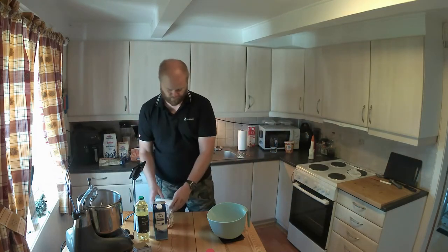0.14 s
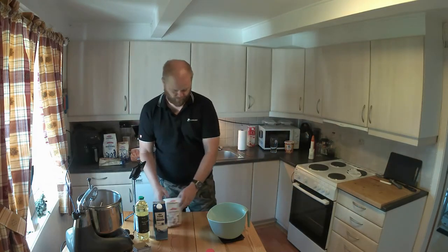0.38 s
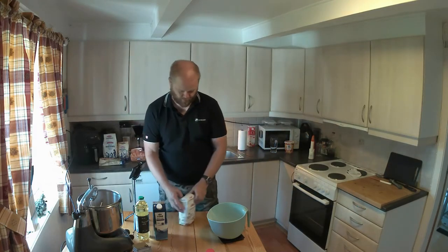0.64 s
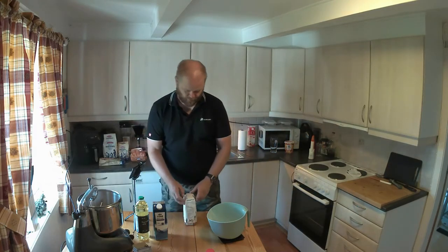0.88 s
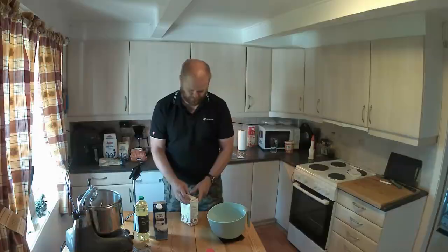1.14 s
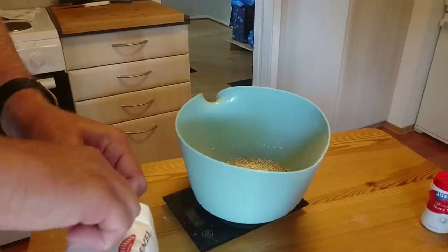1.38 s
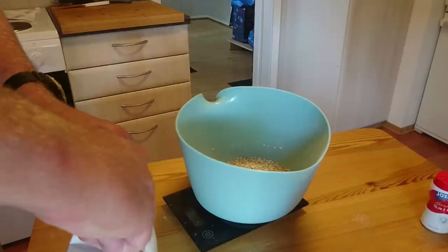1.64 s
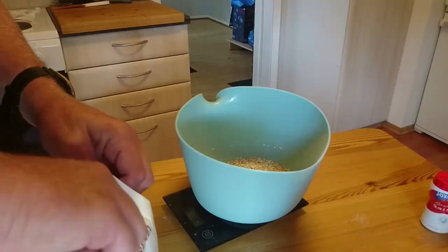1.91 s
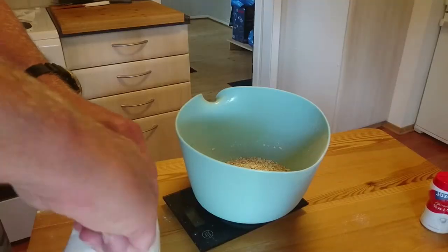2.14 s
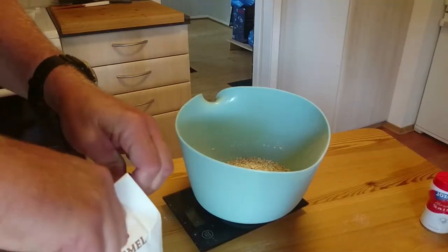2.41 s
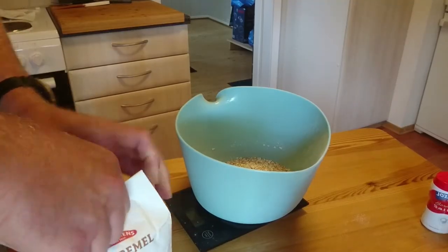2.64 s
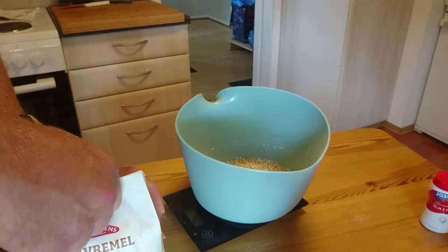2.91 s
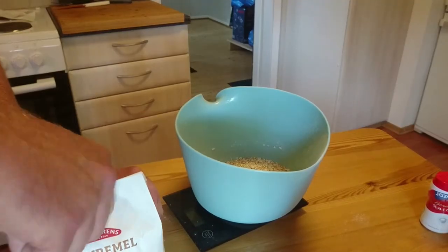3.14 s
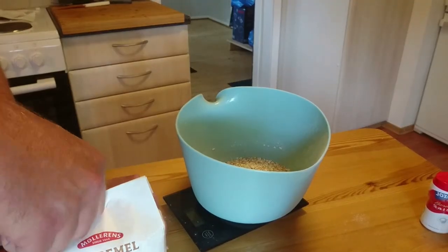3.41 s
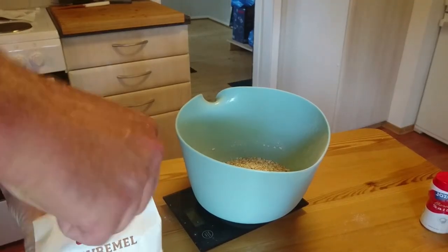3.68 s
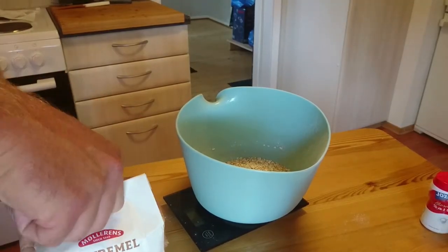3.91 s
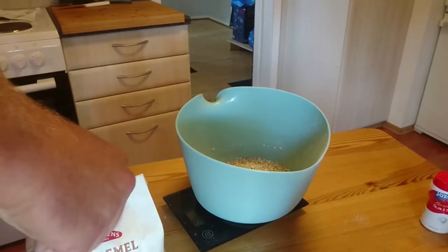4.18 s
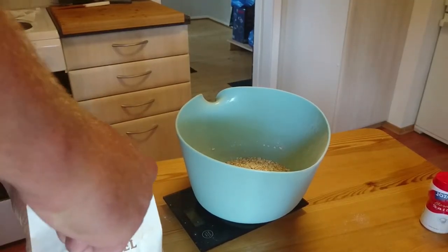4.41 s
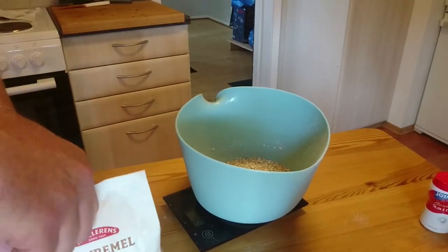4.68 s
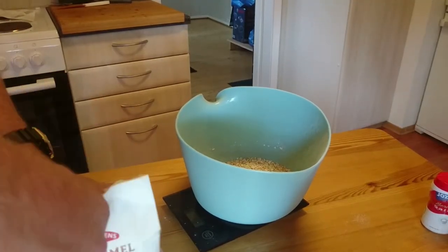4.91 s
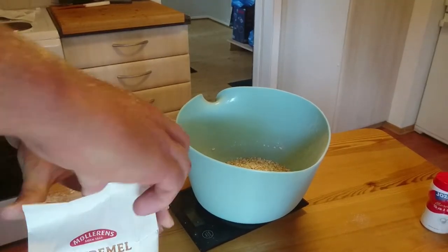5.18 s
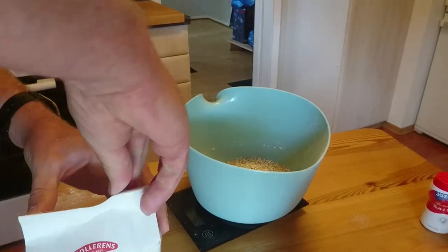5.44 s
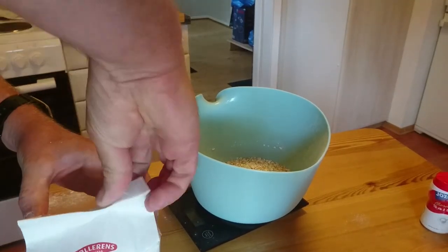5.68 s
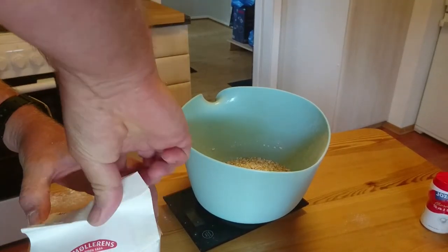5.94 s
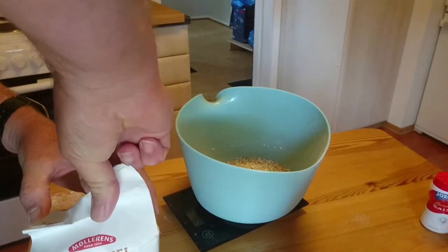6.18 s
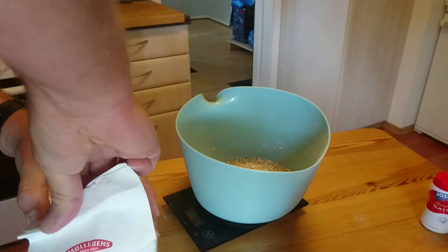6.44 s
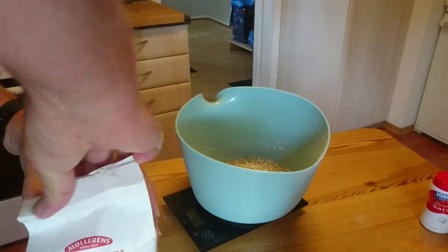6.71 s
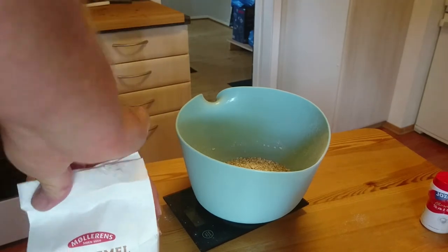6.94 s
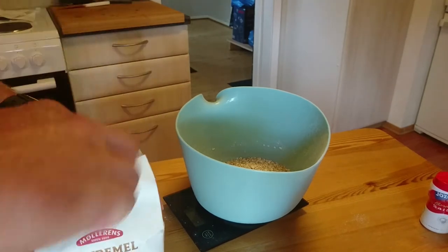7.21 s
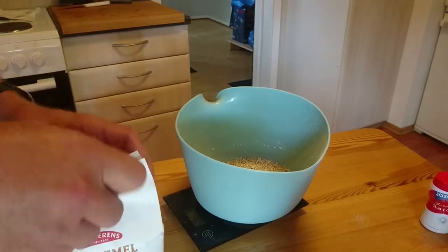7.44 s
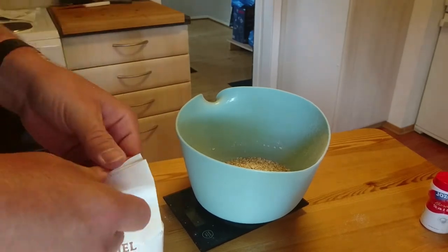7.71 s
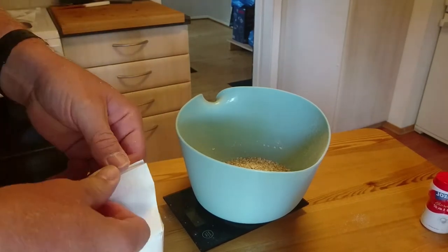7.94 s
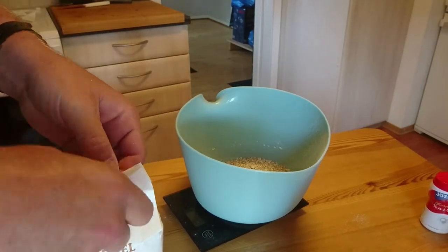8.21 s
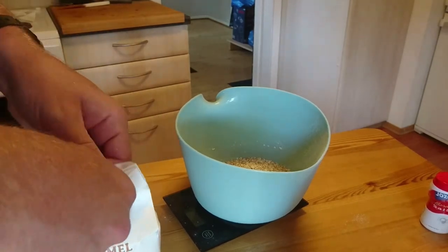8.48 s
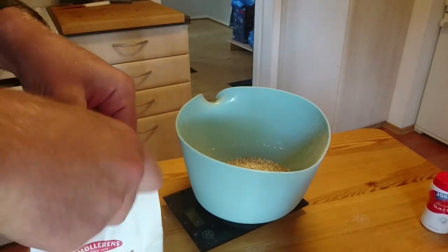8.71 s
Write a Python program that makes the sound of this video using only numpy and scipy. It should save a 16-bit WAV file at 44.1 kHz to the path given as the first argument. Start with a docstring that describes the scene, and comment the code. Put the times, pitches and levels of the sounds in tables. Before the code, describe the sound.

Distant, dull sliding of a bag on wood cuts to crisp close paper crinkling on the left, growing busier and louder with low table bumps.

```python
"""A paper flour bag is handled on a wooden kitchen table, heard from two distances in turn.
First a distant mono microphone hears it slide and land: friction noise rings the table, thuds push its low modes.
Then a close stereo pair, with the bag on its left, hears creases snap as bundles of damped rings, small folds
crackle, fingers rub as noise, the full bag boom softly and the table thud, in a hard-walled kitchen."""
import sys
import numpy as np
from scipy import signal
from scipy.fft import rfft, irfft, next_fast_len
from scipy.io import wavfile
from scipy.ndimage import uniform_filter1d

SR = 44100
rng = np.random.default_rng(int(sys.argv[2]) if len(sys.argv) > 2 else 0)


def persist_wave(psi):
    """Save psi, clipped to +-1, as 16-bit WAV."""
    counts = np.round(np.clip(psi, -1, 1) * 32767).astype(np.int16)
    wavfile.write(sys.argv[1], SR, np.atleast_2d(counts).T)


def voltage_ratio(level):
    """Linear amplitude factor for a level in decibels (scalar or array-like)."""
    return 10 ** (np.asarray(level, float) / 20)


N = 389844
T = np.arange(N) / SR
CUT_S = 1.283  # the close pair takes over
LAG_S = .00027  # the right microphone hears the bag later


def colour(x, table):
    """Linear filtering: the spectrum is weighted by (Hz, dB) points joined on a log axis."""
    size = next_fast_len(N)
    hz, db = np.transpose(table)
    bin_hz = np.arange(size // 2 + 1) * SR / size
    gain = voltage_ratio(np.interp(np.log(bin_hz + 1), np.log(hz + 1), db))
    return irfft(rfft(x, size) * gain, size)[..., :N]


def band(x, lo_hz, hi_hz, order=2):
    """Band limitation: a Butterworth band-pass."""
    return signal.sosfilt(signal.butter(order, [lo_hz, hi_hz], "bandpass", fs=SR, output="sos"), x)


def highpass(x, hz):
    """Radiation efficiency: thin paper radiates no bass."""
    return signal.sosfilt(signal.butter(3, hz, "highpass", fs=SR, output="sos"), x)


def unit(x):
    """Normalisation to rms 1."""
    return x / np.sqrt(np.mean(x ** 2))


def walk(rate):
    """Random modulation: levels drawn every 1 / rate s and slewed, with rms 1."""
    k = int(SR / rate)
    held = np.repeat(rng.standard_normal(N // k + 1), k)
    return unit(uniform_filter1d(held, k)[:N])


def power(s, hold, db, rise_db_s, fall_db_s, share=None):
    """Energy summation: events climb to s, hold, then die at a steady dB rate; share splits them into bands."""
    step = T[::32, None]
    rise_db = rise_db_s * np.maximum(s - step, 0)
    fall_db = fall_db_s * np.maximum(step - s - np.abs(hold), 0)
    each = voltage_ratio(2 * (db - np.minimum(rise_db + fall_db, 120)))
    if share is None:
        return np.interp(T, step[:, 0], each.sum(axis=1))
    return np.array([np.interp(T, step[:, 0], row) for row in (each @ share).T])


def rings(s, peak_db, pan_db, hz, db, t60, late, size):
    """Modal decay: each event is a bundle of damped rings (events x rings), heard left and right."""
    t, waves = np.arange(size) / SR, []
    # bass bends round to both sides
    shadow = np.clip(np.log(hz / 480) / np.log(8), 0, 1.2) * pan_db[:, None] / 2
    for side, sign in enumerate((1, -1)):
        age = np.maximum(t - (late + side * LAG_S)[..., None], 0).astype(np.float32)
        decay = np.exp(-np.log(1000) * age / t60[..., None])
        wave = np.sin(2 * np.pi * hz[..., None] * age) * decay
        waves.append(np.einsum("er,ert->et", voltage_ratio(db + sign * shadow), wave))
    # the mean of the two sides peaks at peak_db
    scale = voltage_ratio(peak_db) / np.abs(waves[0] + waves[1]).max(axis=1) * 2
    first = np.clip(s * SR, 0, N - 1).astype(int)
    where = (first[:, None] + np.arange(size)).ravel()
    return np.array([np.bincount(where, (w * scale[:, None]).ravel(), N + size)[:N] for w in waves])


# colour of the room tone at the close pair, then at the far microphone: pitch_hz, level_db
CLOSE_AIR = [(29, -14), (50, -1), (136, -12.5), (272, -9.5), (369, -13), (724, -6), (919, -16), (4790, -16),
             (9000, -28), (11700, -64), (19800, -120)]
FAR_AIR = [(15, -36), (25, -8), (55, -3.5), (82, -7.5), (117, -9), (236, -15), (962, -25.5), (3250, -35),
           (16000, -27)]


def air(table, db, share):
    """Stationary background noise: quiet room tone whose level wavers a little."""
    mid, side = (unit(colour(rng.standard_normal(N), table)) for _ in range(2))
    side = band(side, 330, 16000, order=1) + 0.61 * side
    return voltage_ratio(db + 1.1 * walk(2.5)) * (mid + share * side * np.array([[1], [-1]]))


# what the kitchen walls give back: pitch_hz, level_db
WALL_COLOUR = [(60, -13), (100, 5.5), (350, 2.5), (700, -0.5), (1500, -4), (2600, -4.5), (4500, -5.5),
               (7500, -2), (12000, 3)]


def kitchen(x):
    """Reverberation: first echo from table and cupboards after 5 ms, then a diffuse decaying tail."""
    t60_s, treble_t60_s, level_db = .65, .6, -0.5
    t = np.arange(int(.7 * SR)) / SR
    noise = rng.standard_normal((2, N))
    # most echoes also come from the left; the bass is alike on both sides
    own = colour(noise[1], [(300, -25), (1200, 4.5), (3000, 4.5)])
    noise[1] = 0.68 * np.roll(noise[0], round(LAG_S * SR)) + own
    noise = colour(noise, WALL_COLOUR)
    low = colour(noise, [(1500, 0), (2800, -6), (5000, -40)])[:, :len(t)]
    treble = noise[:, :len(t)] - low
    tail = low * voltage_ratio(-60 * t / t60_s) + treble * voltage_ratio(-60 * t / treble_t60_s)
    onset = np.clip((t - .0045) / 0.00038, 0, 1)
    tail = tail * onset * (1 + 6.0 * np.exp(-t / 0.015))  # early echoes stand out
    energy = np.sum(tail ** 2, axis=1, keepdims=True)
    tail = tail / np.sqrt(energy) * voltage_ratio(level_db + np.array([[.8], [-.8]]))
    return signal.oaconvolve(x[None] * np.ones((2, 1)), tail, axes=1)[:, :N]


# resonances of the table under the sliding bag: pitch_hz, width_hz, level_db
SLIDE_MODES = [(553, 16, -2), (782, 6.6, 3), (984, 40, -6.5), (1580, 130, -19)]
# broad colour of the grit under the bag: pitch_hz, level_db (per Hz)
SLIDE_BED = [(15, -28), (25, 3), (208, -9.5), (535, -5.5), (636, -7.5), (973, -6.5), (1300, -16),
             (2500, -35), (3250, -54), (5500, -120)]
# drags of the bag over the boards: start_s, hold_s, level_db, hiss_db (relative to level_db)
DRAGS = [(0.067, 0.022, -81, 4), (0.3, .04, -77, -9), (0.36, .15, -66, -6.5), (0.568, 0.046, -65, -5.5),
         (0.625, .02, -61, -8), (0.67, 0.075, -70, -5.5), (0.854, 0.012, -70, -2.5), (0.99, 0.044, -76, -8)]


def slide():
    """Friction excitation: gritty noise from bag on boards rings the table, with a thin hiss above."""
    grit = rng.standard_normal(N) * voltage_ratio(1.2 * walk(59.9))
    table = sum(voltage_ratio(db) * band(grit, hz - w / 2, hz + w / 2, order=1) for hz, w, db in SLIDE_MODES)
    body = unit(table) + voltage_ratio(5.5) * unit(colour(grit, SLIDE_BED))
    hiss_colour = [(900, -33), (2000, -1.0), (6000, -3), (15500, -10), (16500, -50)]
    hiss = colour(rng.standard_normal(N), hiss_colour) * voltage_ratio(3.5 * walk(21.6))
    s, hold, db, hiss_db = np.transpose(DRAGS)
    rise_db_s, fall_db_s, rest_power = 300, 141, voltage_ratio(2 * -86)
    drag = np.sqrt(power(s, hold, db, rise_db_s, fall_db_s) + rest_power)
    thin = np.sqrt(power(s, hold, db + hiss_db, rise_db_s, fall_db_s) + rest_power)
    return drag * unit(body) + thin * unit(hiss)


# bumps of the bag on the table: start_s, level_db, pitch_hz (round which the push is strongest)
THUDS = [(0.401, -56, 90), (0.619, -66, 73), (1.953, -49, 173), (1.999, -55, 43), (2.346, -58.5, 177),
         (2.73, -68, 148), (3.185, -55, 165), (3.239, -56, 42), (3.843, -54.5, 140), (3.949, -44.5, 57.4),
         (4.394, -65, 42), (4.737, -57.5, 200), (5.447, -58, 163), (5.605, -46.5, 204), (5.801, -59, 139),
         (6.111, -62, 171), (6.219, -48, 207), (6.408, -66, 80), (7.006, -69, 210), (7.228, -53, 144),
         (7.339, -57.5, 141), (7.91, -53, 208), (8.121, -45, 207), (8.246, -49, 207), (8.297, -43, 222),
         (8.52, -45.5, 215), (8.712, -43.5, 200), (8.809, -37.5, 213)]
# low modes of the table: pitch_hz, t60_s
TABLE_MODES = [(42, 0.19), (76, 0.25), (145, 0.24), (178, 0.16), (208, 0.13)]


def thuds():
    """Modal excitation: a bump pushes softly into the table's low modes, with a shudder of the legs under it."""
    push_octaves, pan_db = 0.26, 3.5
    out, shudder = 0, unit(band(rng.standard_normal(N), 35, 190))
    for s, level_db, push_hz in THUDS:
        age = np.maximum(T - s, 0)
        for hz, t60 in TABLE_MODES:
            share = np.exp(-(np.log2(hz / push_hz) / push_octaves) ** 2)
            fade = (1 - np.exp(-age / 0.011)) * voltage_ratio(level_db - 60 * age / t60) * share
            out = out + fade * (np.sin(2 * np.pi * hz * age) + voltage_ratio(-13.0) * shudder)
    return out * voltage_ratio((T > CUT_S) * pan_db * np.array([[.5], [-.5]]))  # centred when far


RISE_DB_S = 547  # onset of each squeeze


def top_hiss(under):
    """Modulated noise: a faint hiss above 7 kHz comes and goes, jumping with each snap and following the sound under it."""
    s, hold, db, _, top_db = np.transpose(SQUEEZES)
    snap_s, snap_db = np.transpose(SNAPS)[:2]
    top_power = power(s, hold, db + top_db, RISE_DB_S, 258) + power(snap_s, 0, snap_db - 44, 3000, 400)
    quick, slow = (uniform_filter1d(under ** 2, size=k) + 1e-12 for k in (64, 4096))
    hiss_colour = [(6500, -32), (7800, -16.5), (9500, -20), (12500, -24.5), (15700, -25.5), (16300, -50)]
    hiss = unit(colour(rng.standard_normal((2, N)), hiss_colour))
    hiss = unit(hiss * (quick / slow) ** 0.3)
    return np.sqrt(top_power + voltage_ratio(2 * -81.5)) * voltage_ratio(np.array([[1.6], [-1.6]])) * hiss


BANDS = np.arange(-.75, 3.3, .5)  # octaves above 1 kHz


def around(octave):
    """Spectral spreading: share of power in each band for sounds pitched at these octaves."""
    share = voltage_ratio(-2 * 2.5 * np.abs(BANDS - octave[:, None]))  # 2.5 dB weaker per octave away
    return share / share.sum(axis=1, keepdims=True)


def slices(x):
    """Filter bank: overlapping triangular bands half an octave apart, each at rms 1."""
    size = next_fast_len(N)
    spectrum = rfft(x, size)
    octave = np.log2((np.arange(size // 2 + 1) + 1) * SR / size / 1000)
    weights = [np.clip(1 - 2 * np.abs(octave - o), 0, 1) for o in BANDS]
    return [unit(irfft(spectrum * weight, size)[..., :N]) for weight in weights]


def crackle(rate, spread_db, lo_hz, hi_hz, cycles, pan_db, size):
    """Random impulse process: many small folds, each with its own colour; few are big, and they come in flurries."""
    pitch, weak, late, whole = rng.random((4, int(rate * N / SR), 4))
    s = whole[:, 0] * N / SR
    peak_db = np.minimum(-spread_db * np.log(whole[:, 1] + 1e-9), 13)
    hz = lo_hz * (hi_hz / lo_hz) ** (0.64 * whole[:, 3:] + 0.4195 * pitch)
    fold_pan_db = pan_db + 6 * (whole[:, 2] - .5)
    out = rings(s, peak_db, fold_pan_db, hz, -6 * weak, 0.011 + cycles / hz, 0.0011 * late, size)
    return unit(out * voltage_ratio(2.1 * walk(35)))


# squeezes of the bag: start_s, hold_s, crackle_db, pitch_octaves (above 1 kHz),
# top_db (hiss of the top octave relative to crackle_db)
SQUEEZES = [(1.291, 0.18, -53.5, 2.1, -22), (1.579, .19, -44.5, 1.83, -12.5),
            (1.854, 0.018, -42.5, .7, -46), (1.957, 0.023, -44.5, 0.76, -28),
            (2.081, 0.076, -48.5, 1.46, -20), (2.297, 0.023, -54.5, 1.5, -17),
            (2.356, 0.12, -49, 1.6, -16.5), (2.61, 0.15, -57, 2, -22), (2.831, 0.031, -48, 2, -21),
            (2.926, 0.019, -54, 2.6, -19), (3.166, 0.015, -54, 2.1, -11), (3.528, 0.076, -59, 1.6, -15),
            (3.815, 0.17, -44, 2.5, -7), (4.132, 0.014, -54, 1.2, -55), (4.293, 0.091, -51, 1.6, -10),
            (4.4, 0.03, -52.5, 1.2, -16), (4.54, 0.025, -52.5, 2.9, -11), (4.64, 0.11, -56, 3, -19),
            (4.749, 0.048, -53.5, 0.12, -22), (4.865, .16, -57.5, 1.9, -23), (4.98, 0.013, -52, 0.59, -33),
            (5.08, .03, -49, 0.82, -33), (5.198, 0.047, -56.5, 2.5, -20), (5.333, 0.021, -46, 1, -22),
            (5.435, 0.032, -48.5, 2.6, -25), (5.593, 0.021, -42.5, 0.84, -32),
            (5.76, 0.073, -46.5, 2.4, -22), (5.891, 0.066, -44, 1.5, -14.5), (6.057, 0.066, -43, 2, -10.5),
            (6.12, 0.066, -36, 2.9, -10), (6.26, 0.12, -43, 1.25, -17.5), (6.372, 0.024, -40.5, 0.65, -36),
            (6.41, 0.088, -38.5, 1.9, -14), (6.512, 0.089, -45.5, 2.1, -5.5), (6.737, 0.08, -59, 1.6, -26),
            (6.826, 0.056, -48.5, 0.94, -16.5), (6.997, 0.048, -44, 1.9, -16), (7.134, .05, -58.5, 3.6, -3),
            (7.235, .1, -50.5, 1.4, -24.5), (7.439, 0.028, -49, 2, -23), (7.592, 0.02, -48, 2.7, -16),
            (7.731, .15, -49.5, 1.6, -17.5), (7.903, 0.072, -43, 1.43, -22.5), (8.139, 0.02, -40, 1.2, -18),
            (8.245, 0.081, -38, 0.7, -14.5), (8.42, 0.055, -45, 0.9, -14), (8.524, 0.052, -44, 1.3, -12.5),
            (8.7, 0.088, -41, 0.49, -30), (8.774, .07, -37, 3.7, -15.5)]
# colour of crackle and rub: pitch_hz, level_db
PAPER = [(430, -5), (600, -9), (1190, -3), (1770, 0.5), (2500, -0.5), (4860, 0.5), (7200, 0), (9000, -18)]


def handling():
    """Amplitude modulation: crackle and rub follow the hands, lower for big panels; the full bag booms under them."""
    s, hold, db, octave, _ = np.transpose(SQUEEZES)
    snap_s, snap_db, snap_hz, _ = np.transpose(SNAPS)
    thud_s, thud_db, _ = np.transpose(THUDS)
    # a snap leaves the paper crackling
    after = power(snap_s, 0, snap_db - 35, 3000, 155, around(np.log2(snap_hz / 1000)))
    squeezed = power(s, hold, db, RISE_DB_S, 175, around(octave))
    bands = squeezed + after + voltage_ratio(2 * -91)
    # the boom grows more slowly than the crackle, and jumps with each thud
    paper_db = 10 * np.log10(bands.sum(axis=0))
    boom_db = paper_db - 15 - 0.55 * (paper_db + 56.5)
    boom_power = voltage_ratio(2 * boom_db) + power(thud_s, 0.0076, thud_db - 7, 800, 260)

    folds = highpass(crackle(620, 6.7, 773, 10070, cycles=15, pan_db=10, size=256), 700)
    left, spread = rng.standard_normal((2, N))
    right = np.roll(left, round(LAG_S * SR)) + spread
    right = colour(right, [(700, -1), (1500, 8.5), (4000, -26)])
    rub = np.array([left, right]) * voltage_ratio(2.42 * walk(25))
    grain = unit(folds) + voltage_ratio(-1.0) * rub
    paper = sum(np.sqrt(p) * part for p, part in zip(bands, slices(grain)))
    boom = highpass(crackle(260, 5.8, 221.4, 1380, cycles=13.2, pan_db=-1.0, size=1024), 139)
    return (T > CUT_S) * (colour(paper, PAPER) + np.sqrt(boom_power) * unit(boom))


# snapping creases: start_s, level_db (peak), pitch_hz (strongest ring), low_db (low rings relative to peak)
SNAPS = [(1.2934, -36, 5940, -30), (1.3374, -20.5, 5840, -53), (1.4788, -20, 6800, -42),
         (1.5227, -28, 2240, -26), (1.5547, -21, 4860, -32), (1.5855, -41, 2940, -22),
         (1.6134, -32, 3320, -21), (1.638, -39, 6120, -25), (1.685, -25.5, 5720, -28),
         (1.7417, -22.5, 3620, -36), (1.7727, -22.5, 1570, -15.5), (1.811, -29, 3110, -21),
         (1.8429, -27.5, 1300, -34), (1.8719, -23.5, 1320, -32), (1.9679, -28, 2330, -11.5),
         (1.9935, -27.5, 3230, -30), (2.062, -24.5, 5730, -25), (2.103, -30, 4600, -27),
         (2.1355, -29.5, 1190, -22), (2.1943, -31.5, 2680, -19), (2.3563, -21, 6860, -36),
         (2.4252, -25.5, 2650, -28), (2.4686, -21, 4100, -28), (2.4886, -27, 2280, -18),
         (2.5021, -24.5, 4030, -26), (2.5334, -31.5, 2290, -5), (2.5791, -29, 2540, -29),
         (2.6059, -28.5, 2330, -34), (2.6608, -35.5, 7000, -42), (2.7259, -22, 3500, -46),
         (2.8178, -22, 2890, -22), (2.9301, -33.5, 4530, -19), (3.075, -38.5, 1310, -1.5),
         (3.1726, -32.5, 3770, -29), (3.1731, -52, 3560, -24), (3.1872, -29.5, 5820, -20),
         (3.5016, -33, 3860, -39), (3.5602, -39.5, 7060, -30), (3.6305, -39, 1210, -15),
         (3.663, -21, 3770, -36), (3.7679, -9.5, 4700, -21), (3.8261, -29, 3810, -28),
         (3.8382, -20.5, 2370, -19), (3.9148, -25.5, 1250, -16), (3.936, -22, 3820, -28),
         (3.9537, -12.5, 2350, -27), (4.1169, -41, 2070, -26), (4.276, -28.5, 2480, -23),
         (4.308, -29, 2210, -20), (4.3364, -30, 6850, -29), (4.3929, -20, 1160, -15.5),
         (4.4852, -16.5, 5500, -20.5), (4.532, -18, 3830, -34), (4.6118, -40, 4510, -33),
         (4.729, -39, 980, -14), (4.7511, -31, 993, -17.5), (4.9004, -21, 2910, -22),
         (5.0772, -23.5, 2540, -24), (5.0957, -24, 2250, -17), (5.2457, -37.5, 2600, -25),
         (5.329, -44, 4000, -26), (5.336, -29, 3980, -26), (5.4324, -40, 4150, -25),
         (5.4595, -22.5, 1220, -26), (5.4835, -24, 4300, -27), (5.587, -26, 1250, -27),
         (5.6569, -24.5, 4930, -31), (5.7624, -20.5, 2520, -18), (5.8141, -25, 3470, -11),
         (5.8648, -28, 2250, -37), (5.9082, -42, 2720, -22), (5.9199, -31, 2260, -12),
         (5.9668, -22.5, 2260, -29), (6.0301, -26.5, 3020, -38), (6.045, -31.5, 2230, -34),
         (6.067, -28, 4320, -38), (6.0853, -22, 2740, -38), (6.1198, -13, 5780, -35),
         (6.1465, -19, 7110, -19), (6.2226, -16, 2610, -35), (6.3187, -30, 2730, -28),
         (6.3646, -15.5, 2480, -37), (6.4091, -12.5, 2690, -46), (6.435, -16.5, 3170, -35),
         (6.52, -26, 4400, -21), (6.609, -40, 1380, -16), (6.6096, -26.5, 3250, -21),
         (6.6395, -26, 2600, -36), (6.704, -33.5, 2830, -27), (6.7784, -35.5, 1000, -10),
         (6.83, -35, 4500, -5), (7.0104, -21, 1280, -5), (7.0147, -16, 1030, -16.5),
         (7.0975, -34, 1330, -22), (7.132, -22.5, 4260, -26), (7.3969, -32, 2100, -28),
         (7.5629, -28, 3960, -36), (7.5741, -21.5, 4840, -28), (7.6889, -31, 2710, -29),
         (7.6995, -24.5, 2540, -29), (7.7999, -29.5, 1250, -23), (7.8654, -29, 2890, -26),
         (7.9132, -21.5, 3180, -33), (7.9738, -22, 4600, -17.5), (8.0788, -30, 2800, -15),
         (8.0968, -27, 2230, -10), (8.1457, -15, 2040, -42), (8.1957, -25.5, 3870, -33),
         (8.2344, -26.5, 1240, -14), (8.2638, -27, 2660, -28), (8.28, -19, 2040, -14),
         (8.3018, -19.5, 2000, -21), (8.3355, -22.5, 2860, -20), (8.4286, -28, 2090, -0.5),
         (8.5354, -28.5, 5160, -20), (8.5354, -30.5, 2270, -1), (8.5794, -27, 2160, -11),
         (8.6378, -22, 902, -6), (8.6553, -13, 4430, -12.5), (8.716, -24, 4430, -27),
         (8.728, -26, 2290, -31), (8.7612, -23.5, 4700, -14), (8.7733, -25.5, 3480, 1.5),
         (8.8063, -14, 6940, -21), (8.8063, -26, 2100, -23)]


def snaps():
    """Buckling instability: a crease flips into one strong ring, low bag-wall rings, a spray and aftershocks."""
    s, peak_db, main_hz, low_db = np.transpose(SNAPS)
    pitch, weak, delay, length = rng.random((4, len(s), 26))
    # the spray: short rings within 1.5 ms that share the colour of the crease
    hz = 1100 * 6.67 ** ((np.arange(26) - 4 + pitch) / 16)
    db = -6 * weak - 5.36 * np.abs(np.log2(hz / main_hz[:, None]))
    late = .0015 * delay ** 2
    # the strong ring, then three low rings of the bag wall
    hz[:, 0], db[:, 0], late[:, 0] = main_hz, 5, 0
    hz[:, 1:4] = 420 * 2.5 ** pitch[:, 1:4]
    db[:, 1:4] = low_db[:, None] + 21 - 3 * weak[:, 1:4]
    # neighbouring folds give way over the next 25 ms, at nearby pitches
    hz[:, 20:] = main_hz[:, None] * (0.97 + .5 * pitch[:, 20:])
    late[:, 20:] = 0.0021 + .022 * delay[:, 20:]
    db[:, 20:] = -7 - 8 * weak[:, 20:] - 300 * late[:, 20:]
    t60 = (.0035 + 6 / hz) * (.6 + .8 * length)  # low rings last longer
    pan_db = 21.5 + 8 * (delay[:, 0] - .5)
    near = highpass(rings(s + 0.00037, peak_db, pan_db, hz, db, t60, late, size=1536), 987)

    # summed over all angles, the walls get a broad click, tinted round the strongest ring, and its low part
    sent, age = np.zeros(N + 256), np.arange(256) / SR
    for at, level_db, ring_hz, low in zip((s * SR).astype(int), peak_db, main_hz, low_db):
        tint = np.exp(-age / 0.00068) * np.sin(2 * np.pi * ring_hz * age)
        thump = np.exp(-age / 0.0002) * np.sin(2 * np.pi * 750 * age)
        sent[at] += 6.9 * voltage_ratio(level_db)
        sent[at:at + 256] += voltage_ratio(level_db + 1.5) * tint + voltage_ratio(level_db + low + 26.5) * thump
    return near, colour(sent[:N], [(200, -24.5), (700, -10), (2000, 2), (4000, -3.0), (8000, -4.0)])


def scene():
    """Superposition: far and mono until the cut, then close and wide, with the thuds throughout."""
    (near, sent), hands = snaps(), handling()
    close = near + hands + kitchen(sent + hands[0]) + air(CLOSE_AIR, -71.5, 0.66)
    # the close sound is steeply low-passed at 7.7 kHz; only the top hiss lies above
    close = signal.sosfilt(signal.butter(10, 7700, fs=SR, output="sos"), close)
    far = slide() + air(FAR_AIR, -77.5, 0)
    return np.where(T < CUT_S, far, close + top_hiss(close)) + thuds()


def band_limit(x):
    """A steep low-pass at the top of the band."""
    return signal.sosfilt(signal.butter(12, 16960, fs=SR, output="sos"), x)


def record(dry):
    """Constant offset: the close recorder sits slightly off zero."""
    mix = dry - .00045 * (T > CUT_S)
    return band_limit(mix)


dry = scene()
out = record(dry)
persist_wave(out)
```